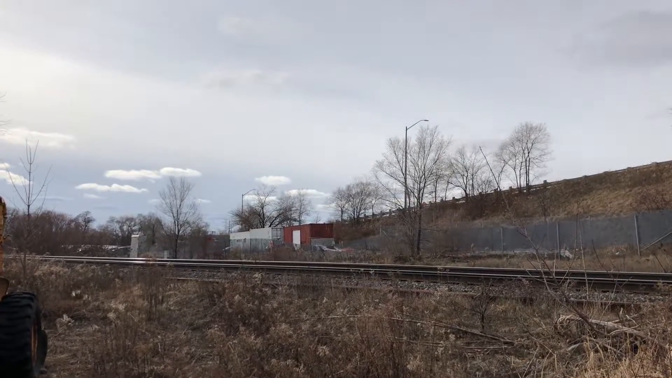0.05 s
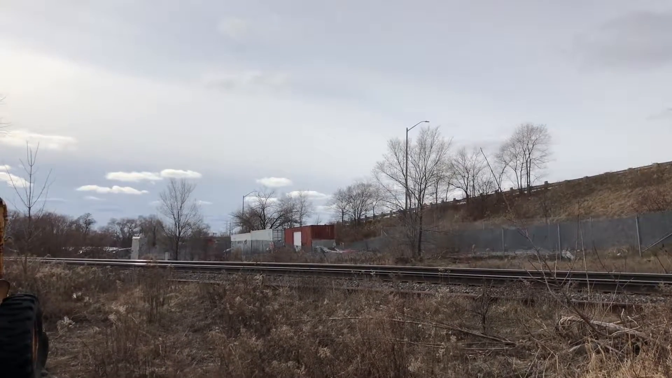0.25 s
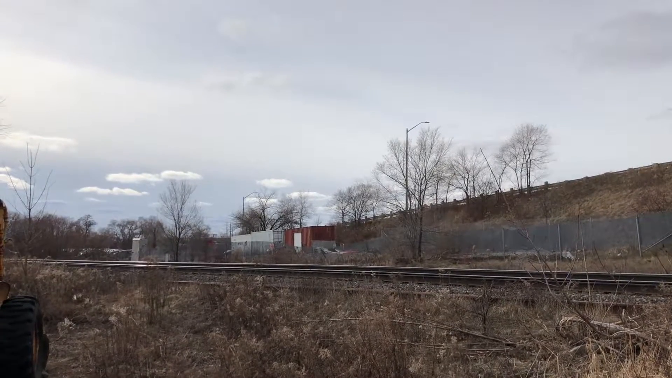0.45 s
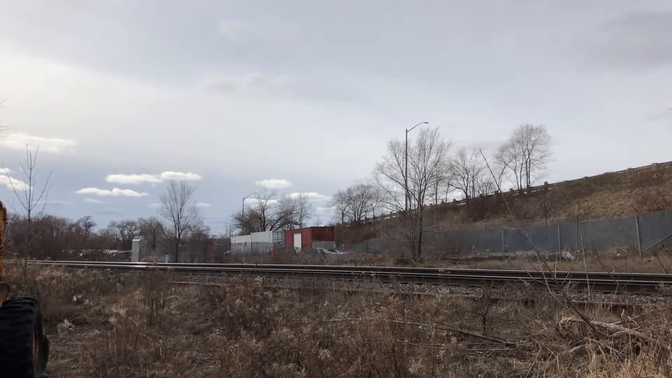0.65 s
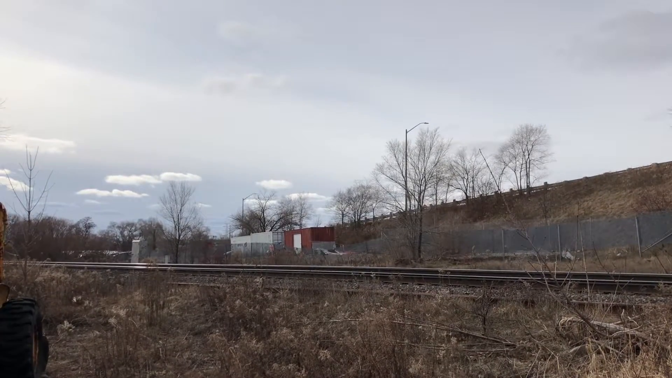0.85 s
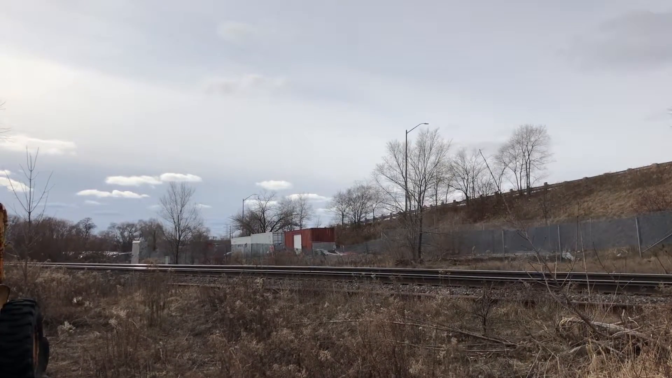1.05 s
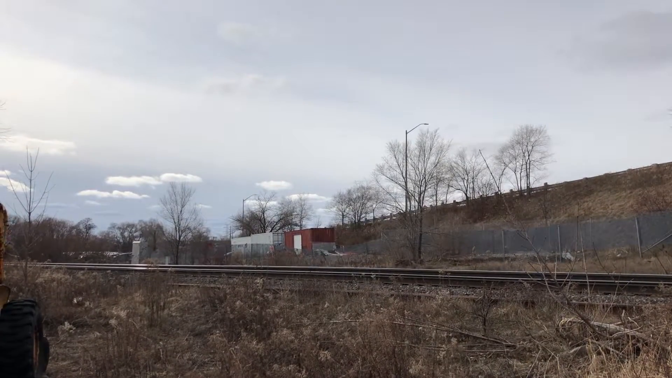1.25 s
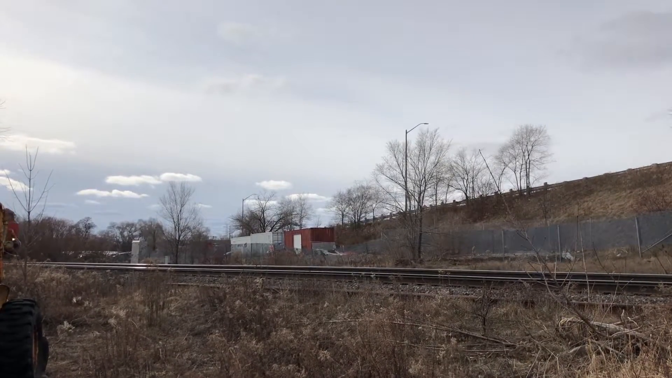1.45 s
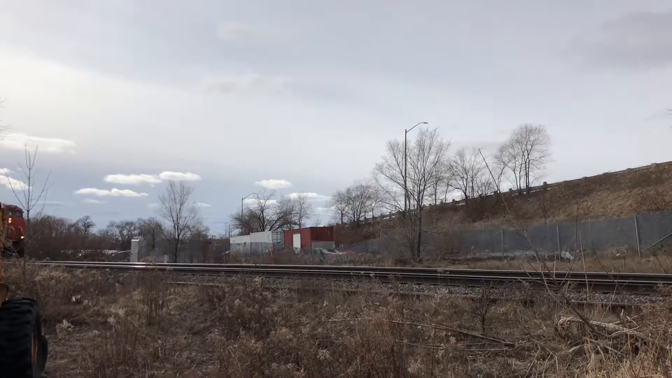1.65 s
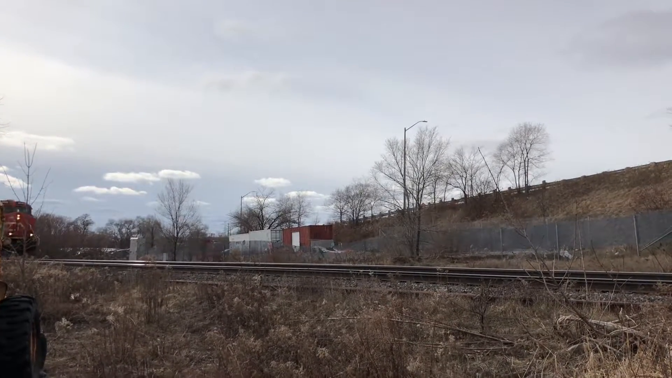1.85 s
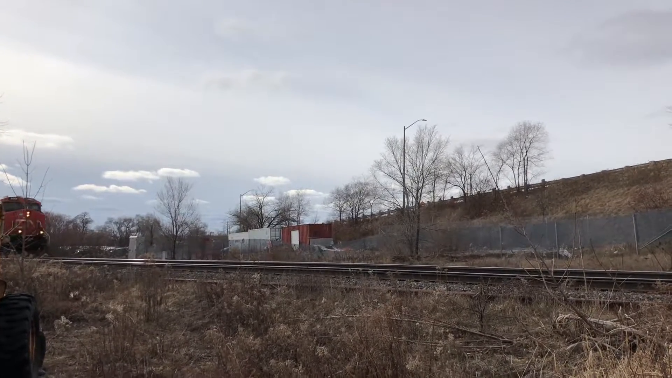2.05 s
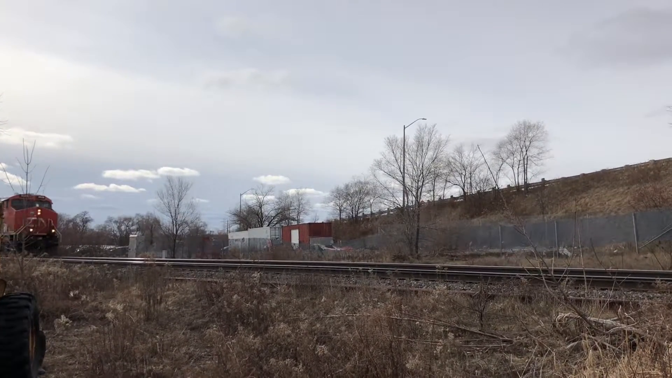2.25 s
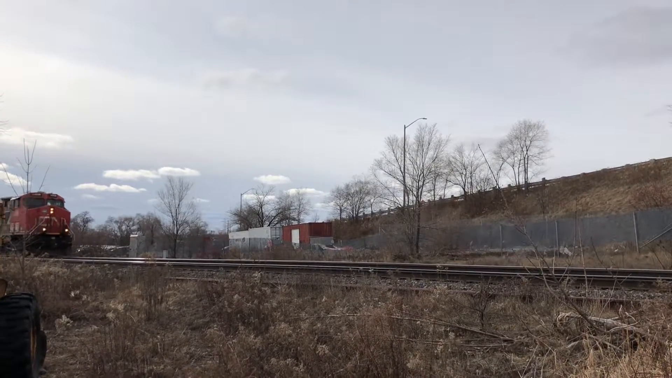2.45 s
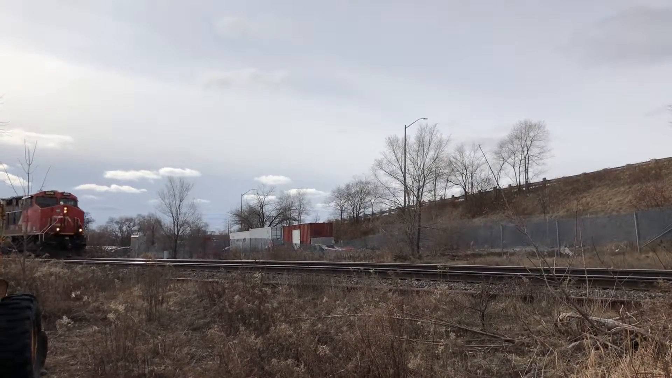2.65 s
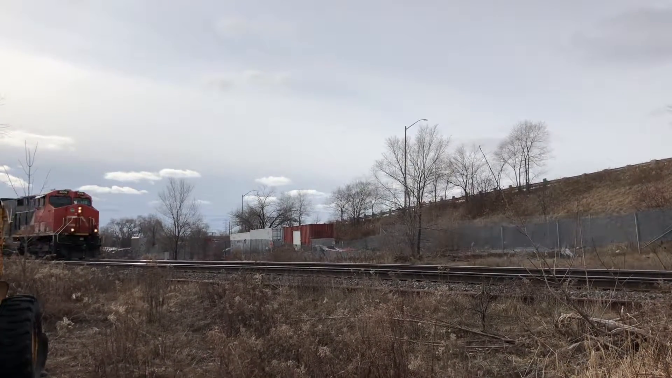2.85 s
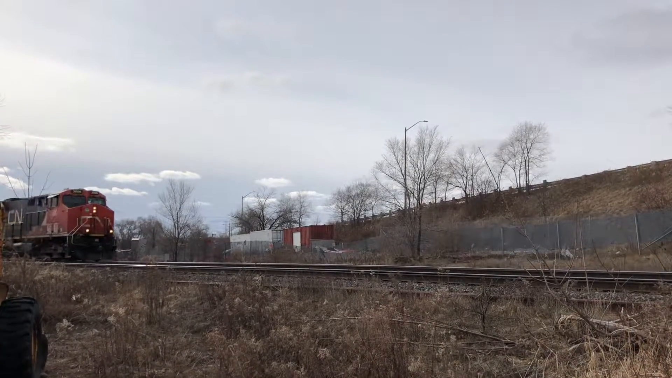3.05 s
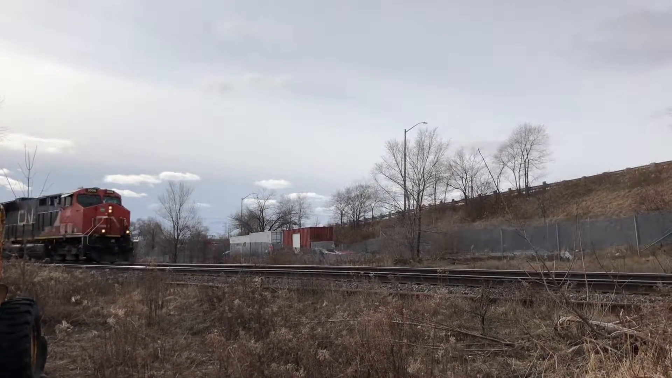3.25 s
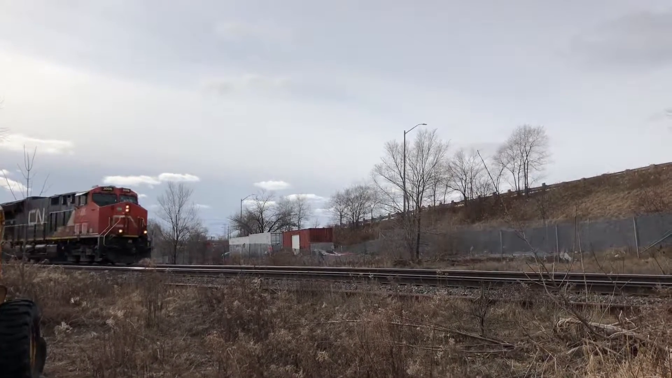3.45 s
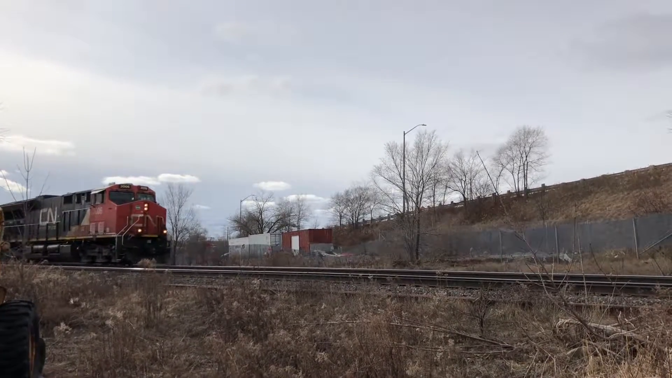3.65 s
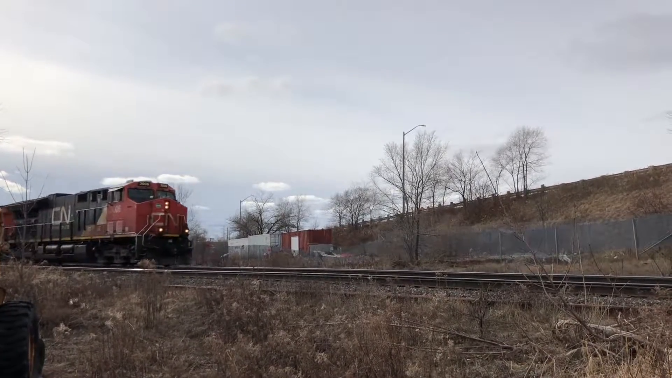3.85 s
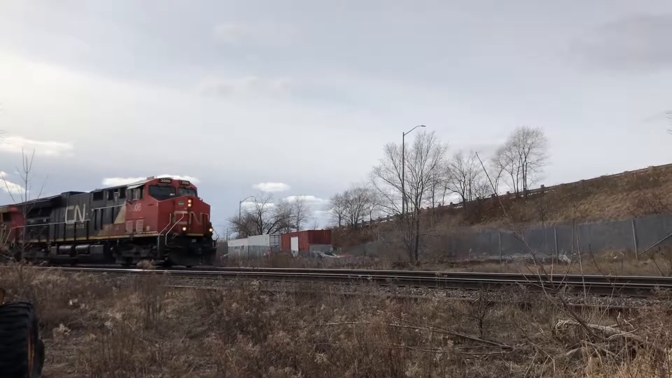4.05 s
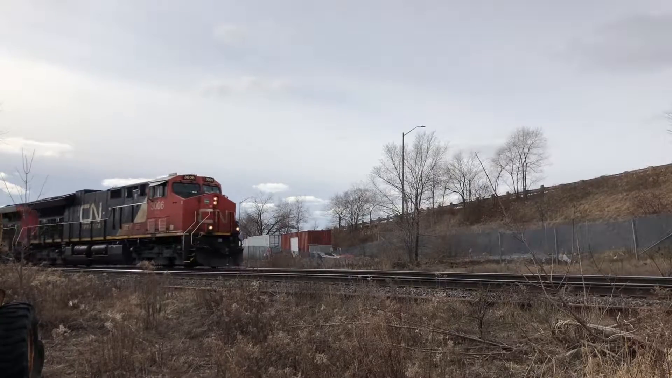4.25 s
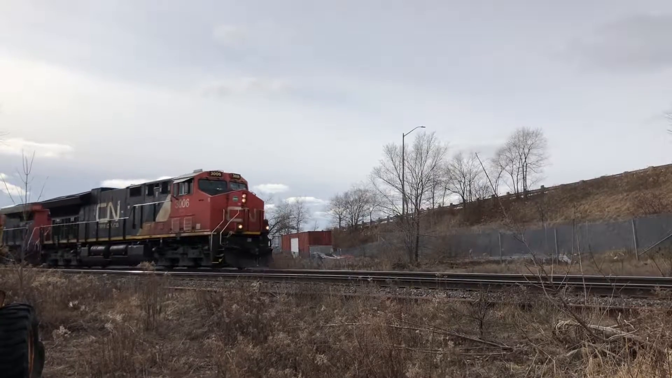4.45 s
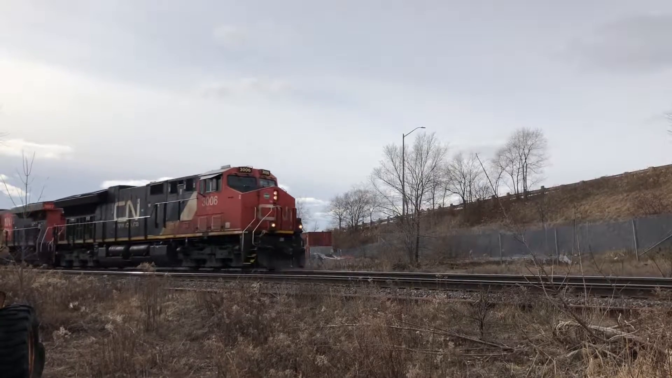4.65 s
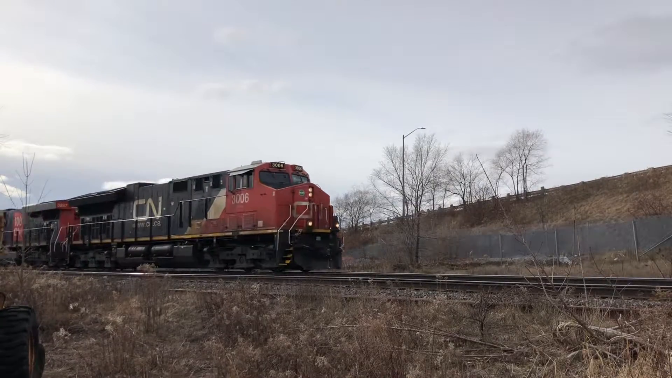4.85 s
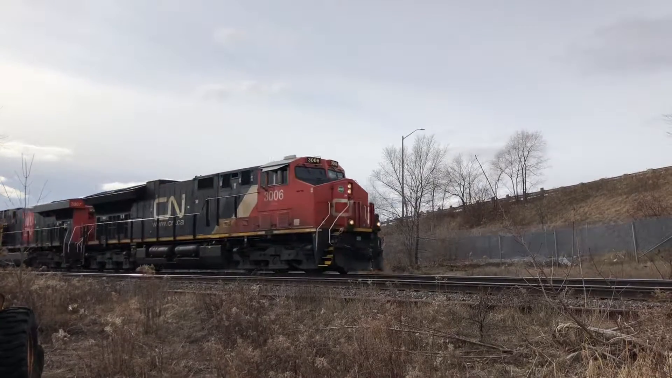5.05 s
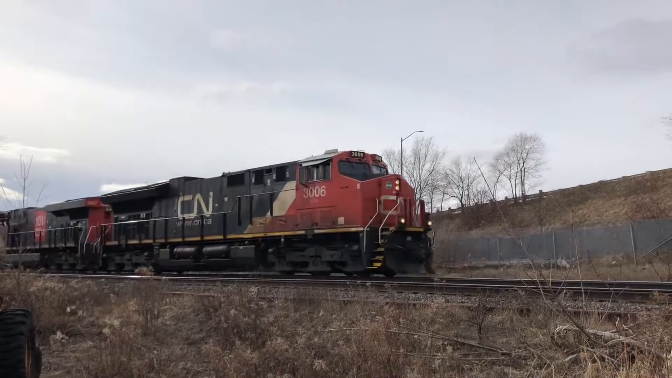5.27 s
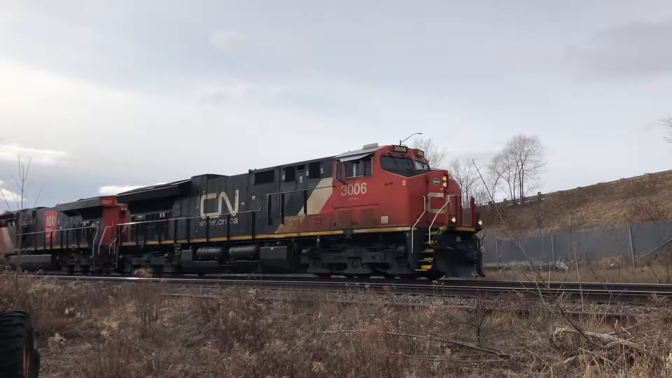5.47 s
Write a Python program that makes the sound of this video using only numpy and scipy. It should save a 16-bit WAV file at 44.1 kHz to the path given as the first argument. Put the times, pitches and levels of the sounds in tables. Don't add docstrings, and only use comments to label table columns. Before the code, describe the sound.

A distant low engine throb grows into a loud, whining diesel roar as a freight train nears, with faint high rail hiss throughout.

```python
import sys
import numpy as np
from scipy import signal
from scipy.fft import rfft, irfft
from scipy.io import wavfile
from scipy.ndimage import uniform_filter1d

SR = 44100
rng = np.random.default_rng(int(sys.argv[2]) if len(sys.argv) > 2 else 0)


def gain_from_db(level_db):
    decades = np.asarray(level_db, float) / 20
    return 10 ** decades


def generate_wav(sig):
    pcm = np.round(np.clip(np.atleast_2d(sig).T, -1, 1) * 32767).astype(np.int16)
    wavfile.write(sys.argv[1], SR, pcm)


N = 242991
TIME = np.arange(N) / SR

# time in seconds, rumble in dB,
# machinery in dB above the rumble, fan and wheel hiss in dB above the rumble.
APPROACH = [
    [(0.0, -30, -11.5, -24.5), (2.42, -25.5, -9.5, -22), (5.48, -15.5, -4.5, -14), (5.51, -20, -1, -7.5)],
]
# time in seconds, pitch factor.
DOPPLER = [
    (0, 1.0),
    (3, 1.0),
    (4, .9988),
    (5, .9962),
    (5.51, .9942),
]


def evened(x):
    return x / np.sqrt(np.mean(x ** 2) + 1e-20)


def curve(rows, column=1, t=TIME):
    rows = np.asarray(rows, float)
    return np.interp(t, rows[:, 0], rows[:, column])


def drift(per_s, count):
    knots_per_s = 40
    knots = rng.standard_normal((count, round(N / SR * knots_per_s)))
    rates = np.fft.rfftfreq(knots.shape[1], 1 / knots_per_s)
    slow = irfft(rfft(knots) / (1 + (rates / per_s) ** 2))
    return evened(signal.resample(slow, N // 100 + 1, axis=1)).repeat(100, 1)[:, :N]


def colour_db(rows, hz):
    table_hz, table_db = np.transpose(rows)
    return curve(np.c_[np.log(table_hz), table_db], 1, np.log(hz + 1))


def noise(far, near=None, size=1024, patchy_db=1.5):
    near = near or far
    hop, hz = size // 4, np.fft.rfftfreq(size, 1 / SR)
    frames = N // hop + 5
    real, imaginary, patches = rng.standard_normal((frames, len(hz), 3)).T
    patches = uniform_filter1d(patches, size=9, axis=0)
    patches = evened(uniform_filter1d(patches, size=12, axis=1))
    far_db, near_db = colour_db(far, hz), colour_db(near, hz)
    blend_db = far_db[:, None] + np.linspace(0, 1, frames) * (near_db - far_db)[:, None]
    inside = (hz > far[0][0]) & (hz < near[-1][0])
    gain = gain_from_db(blend_db) * inside[:, None]
    gain /= np.sqrt((gain ** 2).mean(0))
    spectra = (real + 1j * imaginary) * gain * gain_from_db(patchy_db * patches)
    return evened(signal.istft(spectra, nperseg=size, noverlap=size - hop)[1][:N])


def whistle(hz, width_hz):
    r = np.exp(-np.pi * width_hz / SR)
    slow = signal.lfilter([1], np.poly([r, r]), rng.standard_normal((2, N)))
    angle = 2 * np.pi * hz * TIME
    return evened(slow[0] * np.cos(angle) + slow[1] * np.sin(angle))


def bursts(rows):
    out = np.zeros(N)
    for start_s, length_s, hz, width_hz, db in rows:
        progress = np.clip((TIME - start_s) / length_s, 0, 1)
        swell = np.sqrt(np.clip(np.sin(np.pi * progress), 0, 1))
        out += gain_from_db(db) * whistle(hz, width_hz) * swell
    return out


def closeness():
    return gain_from_db(curve(APPROACH[0]) - APPROACH[0][-1][1] - 2.5)


def engine(orders, cycle_hz, waver_db, wander):
    turns = np.cumsum(cycle_hz) / SR
    order, far_db, near_db = np.transpose(orders)[:, :, None]
    nearness = np.clip((TIME - 1.4) / 2.7, -.3, 1.3)
    level_db = far_db + (near_db - far_db) * nearness + waver_db * drift(1.5, count=len(order))
    phase = 2 * np.pi * (order * turns + rng.random(order.shape))
    phase += wander * drift(1.5, count=len(order))
    return np.sqrt(2) * (gain_from_db(level_db) * np.cos(phase)).sum(0)


def engines(trail_cycle_hz):
    # order of the cycle, level in dB when far, level in dB when near, both scaled to the closest point.
    lead_exhaust = [(6, -41, -45), (7, -30.5, -36), (8, -40, -49), (9, -29.5, -32), (10, -37, -36),
                    (12, -31, -28), (14, -29.5, -27), (15, -30, -29.5), (19, -42, -41), (20, -44, -45),
                    (21, -42, -36.5), (22, -39, -42), (23, -40.5, -52), (24, -46, -43.5), (26, -50, -45),
                    (28, -49, -49), (29, -48, -50), (30, -38, -44), (31, -40.5, -44.5)]
    # order of the cycle, level in dB when far, level in dB when near.
    lead_block = [(37, -50, -53), (38, -57, -62), (39, -49, -56), (40, -49, -68), (44, -47, -49.5),
                  (47, -56, -48.5), (51, -47.5, -55), (52, -56, -61), (53, -48.5, -70), (61, -58, -56),
                  (74, -57, -48), (82, -60, -55), (83, -61, -50), (93, -58, -46), (94, -57, -46.5),
                  (95, -48, -47.5), (96, -54, -44), (97, -45, -47.5), (99, -47.5, -47), (100, -56, -47),
                  (102, -50, -54), (104, -50, -52), (106, -58, -55), (107, -55, -60), (108, -60, -56),
                  (111, -52, -52.5)]
    # order of the cycle, level in dB when far, level in dB when near.
    trail_exhaust = [(5, -47, -51), (6, -35, -34.5), (7, -40, -44), (9, -28, -34.5), (10, -37, -38.5),
                     (12, -24.5, -25.5), (13, -28.5, -29.5), (14, -33.5, -36), (15, -25, -23),
                     (16, -35, -35.5), (17, -45, -38.5), (18, -34, -35), (19, -55, -49), (20, -42, -47),
                     (21, -36, -34.5), (22, -44, -41), (24, -46, -47), (25, -43, -46), (26, -38.5, -38.5),
                     (27, -37.5, -33.5), (28, -36.5, -36), (29, -43, -41.5), (30, -48, -49)]
    # order of the cycle, level in dB when far, level in dB when near.
    trail_block = [(31, -46, -43), (32, -51, -51), (33, -55, -59), (34, -51, -56), (40, -51, -47),
                   (42, -52, -57), (44, -55, -51.5), (45, -53.5, -56), (46, -54, -49), (50, -55, -48.5),
                   (53, -57, -49.5), (58, -65, -53), (61, -54, -47.5), (64, -59, -50.5), (65, -54, -48.5),
                   (70, -60, -52), (71, -56, -47), (77, -56, -56), (80, -51, -42.5), (82, -63, -47),
                   (83, -53, -42), (84, -44, -51), (85, -51, -54), (90, -55, -59), (102, -48, -55),
                   (103, -50, -48)]
    lead_hz = 6.898 * curve(DOPPLER)
    trail_hz = np.full(N, trail_cycle_hz)
    exhausts = engine(lead_exhaust, lead_hz, 1.6, .3) + engine(trail_exhaust, trail_hz, 1.6, .3)
    blocks = engine(lead_block, lead_hz, 2.5, .6) + engine(trail_block, trail_hz, 2.5, .6)
    return closeness() * (exhausts + blocks)


def roar(trail_cycle_hz):
    # frequency in Hz, level in dB.
    rumble_colour = [(22, -40), (36, -26), (45, -6), (70, 0.5), (110, 2.5), (150, -6), (215, -7.5),
                     (260, -18), (320, -18.5), (420, -34)]
    # frequency in Hz, level in dB.
    machinery_colour = [(200, -30), (300, -1), (430, -4.5), (650, -0.5), (800, -2), (1300, -2), (1900, -6),
                        (2200, -13), (2650, -23.5), (3000, -48)]
    # frequency in Hz, level in dB.
    hiss_far = [(1470, -29), (2500, -4), (2830, -2), (3260, -0.5), (4650, -1.5), (5700, -9.5), (6780, -9),
                (10200, -24.5), (11000, -25), (14300, -47), (22000, -120)]
    # frequency in Hz, level in dB.
    hiss_near = [(1470, -37), (2500, -9), (2810, -14), (3200, -3), (3870, -0.5), (5520, -2), (6540, -11.5),
                 (7800, -7.5), (10100, -13), (10900, -14), (15100, -19), (15700, -20)]
    rumble_db = curve(APPROACH[0])
    machinery_db = rumble_db + curve(APPROACH[0], column=2) - 3
    hiss_db = rumble_db + curve(APPROACH[0], column=3) + 0.42
    rumble = gain_from_db(rumble_db - 10) * noise(rumble_colour, size=4096)
    machinery = gain_from_db(machinery_db) * noise(machinery_colour, size=2048)
    cycle = 2 * np.pi * trail_cycle_hz * TIME
    throb = 1 + .08 * np.cos(6 * cycle) + .06 * np.cos(3 * cycle)
    hiss = gain_from_db(hiss_db) * throb * noise(hiss_far, hiss_near, size=512)
    return rumble + machinery + hiss


def turbocharger():
    # time in seconds, level in dB.
    blade_levels = [
        (3.6, -65),
        (4.014, -55),
        (4.956, -54),
        (5.084, -41),
        (5.51, -54),
    ]
    fade_in = np.clip((TIME - 3.6) / .2, 0, 1)
    return gain_from_db(curve(blade_levels) - 1.5) * fade_in * whistle(10080, width_hz=200)


def gears(waver_db=1.56, wander=.4):
    axle_speeds = [1.0, .9855, .9945, 1.0105, .967, .957]
    # time in seconds, levels in dB of tooth harmonics 1, 2, 3 and 4.
    axle_levels = [
        [(0.0, -40.5, -67, -65, -64), (0.5, -58, -61.5, -62, -63), (1.0, -59, -67, -53, -63),
         (1.5, -53, -58, -50, -54), (2.0, -51, -66.5, -49, -49.5), (2.5, -51, -58, -44.5, -44),
         (3.0, -58.5, -60, -42, -43), (3.5, -46, -59, -36.5, -49), (4.0, -49, -39, -41, -38),
         (4.5, -52, -41, -32, -33), (5.0, -39, -34.5, -33, -32.5), (5.51, -40, -30, -35, -25.5)],
        [(0.0, -54, -71, -70, -63), (0.5, -58, -61, -56, -54), (1.0, -61, -66, -50, -62),
         (1.5, -60, -52, -53, -50), (2.0, -54, -53, -54, -51), (2.5, -48.5, -57, -54, -49.5),
         (3.0, -51, -55, -48, -35.5), (3.5, -49.5, -55, -38, -36.5), (4.0, -46, -56, -56, -35),
         (4.5, -40.5, -46, -36, -50), (5.0, -33, -42, -29.5, -30), (5.51, -25.5, -37, -47, -54)],
        [(0.0, -53, -68, -74, -67), (0.5, -53, -71, -58, -57), (1.0, -59, -67, -53, -57),
         (1.5, -54, -59, -61, -51), (2.0, -51, -55, -54, -70), (2.5, -50, -61, -63, -58),
         (3.0, -51, -49, -55, -61), (3.5, -48.5, -53, -47, -38), (4.0, -45.5, -45, -36.5, -35.5),
         (4.5, -53, -44, -38, -40), (5.0, -34, -47, -31, -44), (5.51, -37, -42, -35, -29)],
        [(0.0, -62, -62, -63, -76), (0.5, -54, -71, -67, -64), (1.0, -60, -58, -68, -61),
         (1.5, -62, -61, -71, -64), (2.0, -50, -53, -65, -63), (2.5, -63, -47, -57, -53),
         (3.0, -64, -46, -53, -46), (3.5, -49, -57, -62, -41), (4.0, -57, -44, -54, -34),
         (4.5, -57, -40, -52, -36), (5.0, -40, -47, -52, -50), (5.51, -52, -36, -42, -44)],
        [(0.0, -55, -72, -61, -72), (0.5, -51, -70, -61, -61), (1.0, -60, -63, -60, -63),
         (1.5, -69, -65, -59, -51), (2.0, -66, -51, -57, -53), (2.5, -68, -51, -47, -59),
         (3.0, -62, -51, -43, -55), (3.5, -57, -57, -58, -45), (4.0, -58, -44, -49, -54),
         (4.5, -54, -47, -41, -53), (5.0, -37.5, -48, -42, -55), (5.51, -41, -39, -48, -55)],
        [(0.0, -56, -63, -68, -72), (0.5, -53, -73, -67, -60), (1.0, -59, -59, -50, -59),
         (1.5, -54, -59, -65, -63), (2.0, -49, -57, -59, -69), (2.5, -55, -64, -57, -68),
         (3.0, -51, -45, -50, -58), (3.5, -51, -51, -45, -58), (4.0, -51, -51, -51, -57),
         (4.5, -49, -49, -46, -57), (5.0, -44, -53, -50, -55), (5.51, -35, -56, -39, -53)],
    ]
    mesh_hz = 320.8 * curve(DOPPLER)
    harmonic = np.arange(1, 5)[:, None]
    out = np.zeros(N)
    for speed, rows in zip(axle_speeds, axle_levels):
        turns = np.cumsum(speed * mesh_hz) / SR
        level_db = np.array([curve(rows, column=k) for k in harmonic[:, 0]])
        level_db += waver_db * drift(3.0, count=4)
        phase = 2 * np.pi * (harmonic * turns + rng.random((4, 1))) + wander * drift(3.0, count=4)
        out += np.sqrt(2) * (gain_from_db(level_db) * np.cos(phase)).sum(0)
    return out


def gear_blur():
    # frequency in Hz, width in Hz, level in dB at the closest point.
    smears = [(1593, 25, -45.5), (1915, 30, -47.5), (2222, 30, -49.5), (940, 50, -37), (1255, 50, -38),
              (650, 60, -42)]
    return closeness() * sum(gain_from_db(db) * whistle(hz, width_hz) for hz, width_hz, db in smears)


def rail():
    # time in seconds, rail level in dB, share of the lower rail modes in dB.
    singing = [(0.0, -53, -16), (0.87, -48, -11), (1.27, -54, -10), (2.1, -48.5, -9), (2.59, -52.5, -7),
               (2.92, -64, 3), (2.93, -58, -7), (3.33, -68, 2), (3.38, -52, -9), (3.51, -54, -8),
               (3.57, -43, -9), (3.82, -46.5, 1), (4.43, -44, -9), (4.93, -49.5, 0), (5.32, -45, -2),
               (5.51, -50, -4)]
    # frequency in Hz, level in dB.
    high_colour = [(7820, -41), (13300, -8), (15100, 5.5), (15700, -1)]
    # frequency in Hz, level in dB.
    low_colour = [(6470, -46), (11000, -16), (11700, -11), (12400, -7), (12700, -3), (13600, 2)]
    # frequency in Hz, level in dB.
    clear_modes = [(11230, -86), (11375, -84), (11553, -84), (11752, -85), (11827, -79), (12139, -83),
                   (12532, -85), (12710, -79), (12775, -76), (12958, -77), (13162, -69), (13216, -71),
                   (13921, -72), (14061, -71), (14583, -67), (14621, -67), (14745, -69), (15294, -68),
                   (15482, -65), (15595, -68)]
    fades = gain_from_db(4.0 * drift(2.5, count=len(clear_modes)))
    modes = sum(gain_from_db(db + 50) * fade * whistle(hz, 14) for (hz, db), fade in zip(clear_modes, fades))
    lower = gain_from_db(curve(singing, column=2) - 2.0) * noise(low_colour, patchy_db=2.0)
    return gain_from_db(curve(singing) - 0.7) * (noise(high_colour, patchy_db=2.5) + lower + modes)


def rail_flares():
    # start in seconds, length in seconds, frequency in Hz, width in Hz, level in dB.
    flares = [
        (.76, .14, 14060, 30, -54),
        (1.4, .6, 11827, 15, -72),
        (1.65, .5, 13216, 25, -60),
        (2.2, .4, 13650, 25, -66),
        (3.54, .12, 14002, 40, -50),
        (3.66, .46, 12516, 20, -55),
        (4.3, .35, 14000, 40, -56),
    ]
    return bursts(flares)


def air_puff():
    # time in seconds, level in dB.
    puff_levels = [
        (.46, -73),
        (.5, -49),
        (.6, -44),
        (.7, -45.5),
        (.8, -49.5),
        (1.05, -57),
        (1.15, -80),
    ]
    # frequency in Hz, level in dB.
    puff_colour = [(1530, -39), (2600, -6), (3560, 2), (4230, 0), (4570, -9), (6970, -9), (8390, -14),
                   (12000, -19), (15600, -48), (22000, -120)]
    return gain_from_db(curve(puff_levels)) * (TIME < puff_levels[-1][0]) * noise(puff_colour, size=512)


def clank():
    # start in seconds, length in seconds, frequency in Hz, width in Hz, level in dB.
    knocks = [
        (.9, .08, 1640, 90, -42.5),
    ]
    return bursts(knocks)


def scene():
    trail_cycle_hz = 7.961
    train = engines(trail_cycle_hz) + roar(trail_cycle_hz) + turbocharger() + gears() + gear_blur()
    return (train + rail() + rail_flares() + air_puff() + clank())[None]


def roll_off(x):
    return signal.sosfilt(signal.butter(12, 16920, fs=SR, output="sos"), x)


def record(dry):
    return roll_off(dry)


dry = scene()
out = record(dry)
generate_wav(out)
```